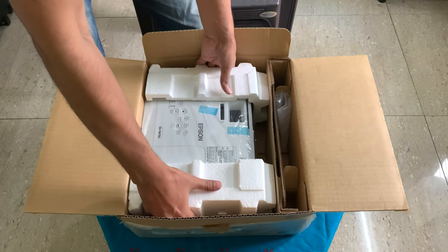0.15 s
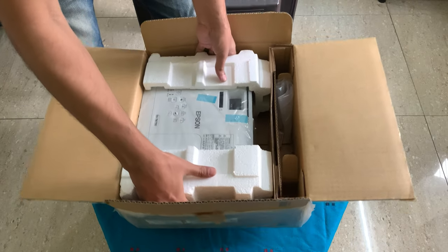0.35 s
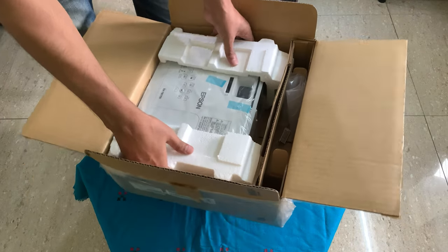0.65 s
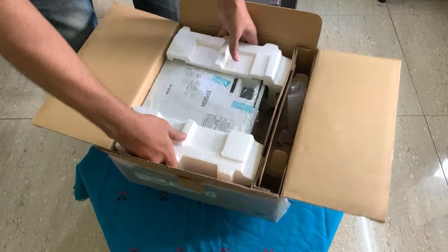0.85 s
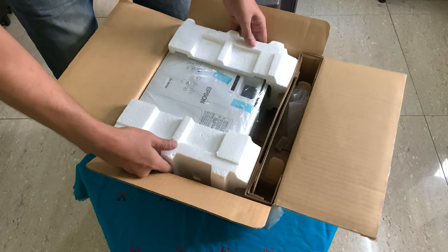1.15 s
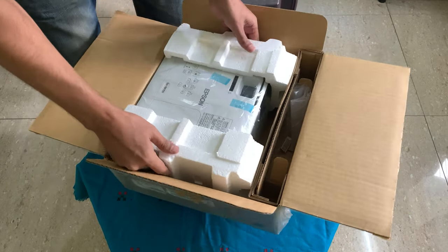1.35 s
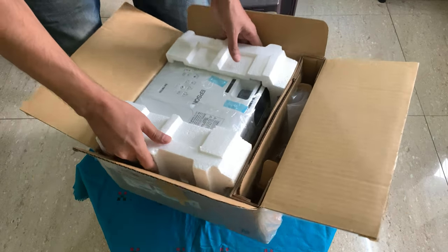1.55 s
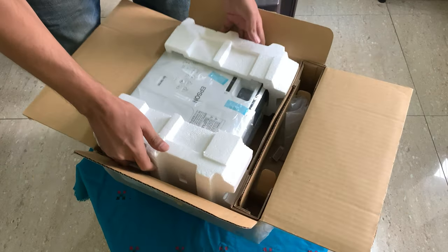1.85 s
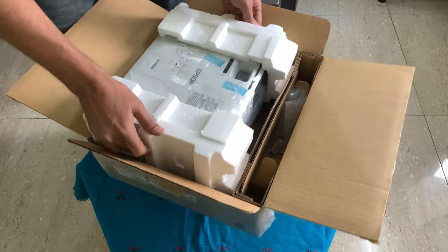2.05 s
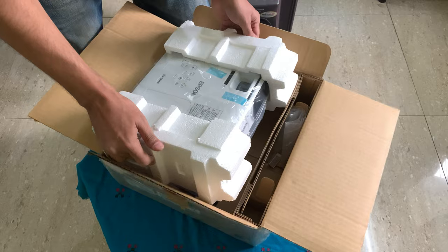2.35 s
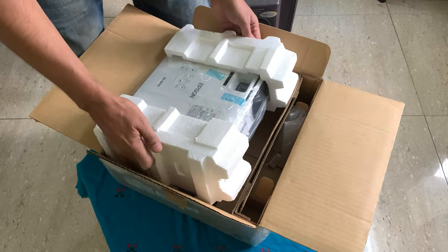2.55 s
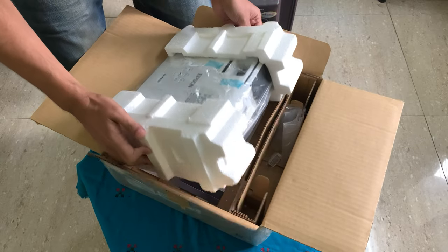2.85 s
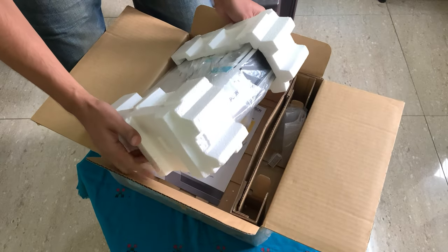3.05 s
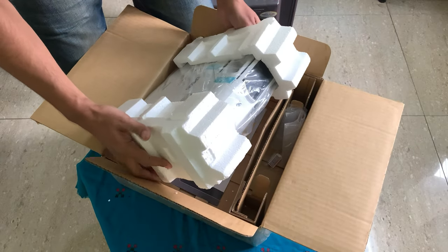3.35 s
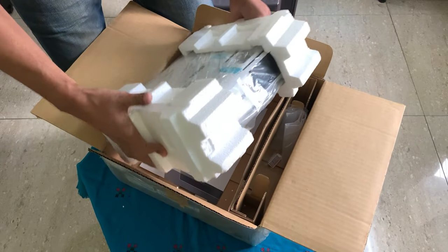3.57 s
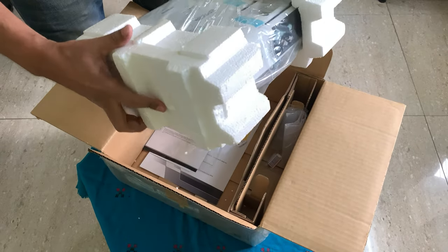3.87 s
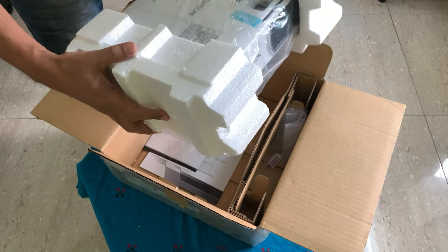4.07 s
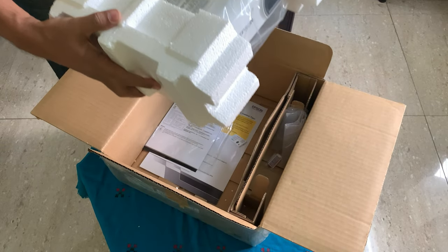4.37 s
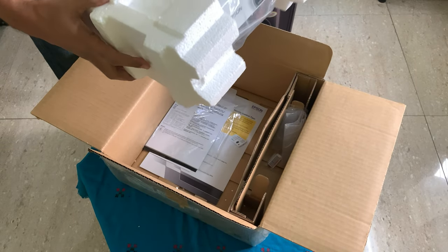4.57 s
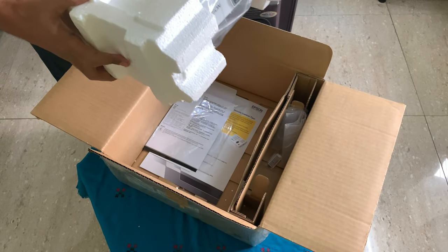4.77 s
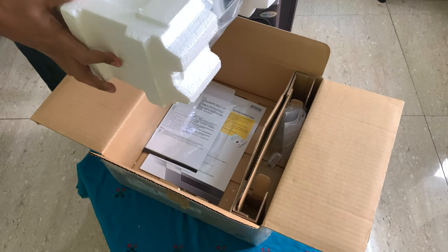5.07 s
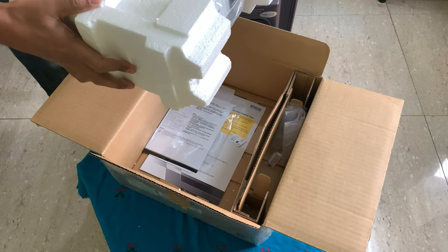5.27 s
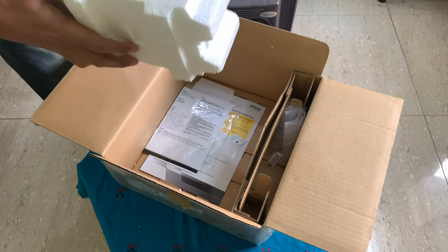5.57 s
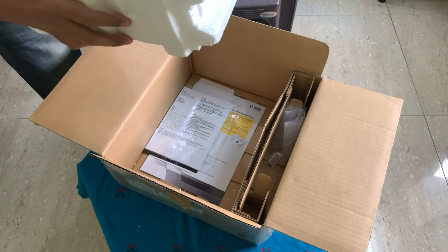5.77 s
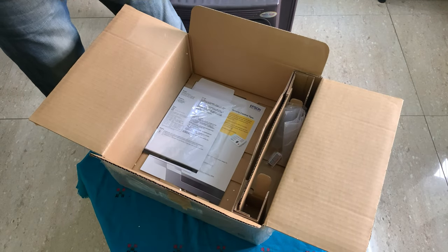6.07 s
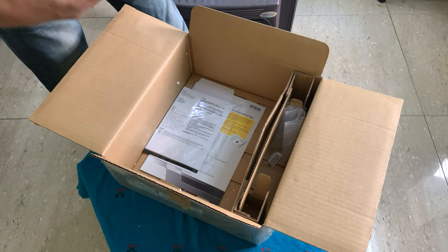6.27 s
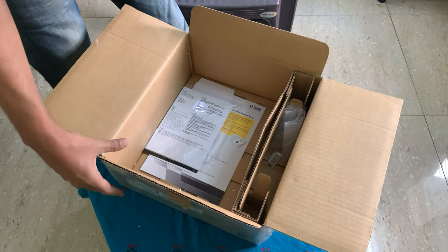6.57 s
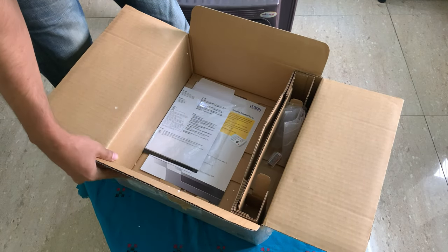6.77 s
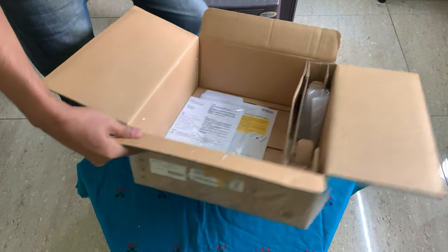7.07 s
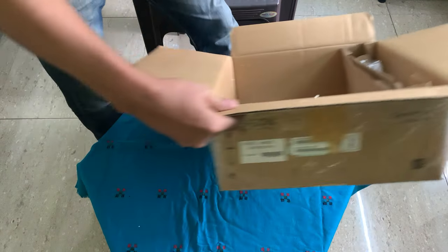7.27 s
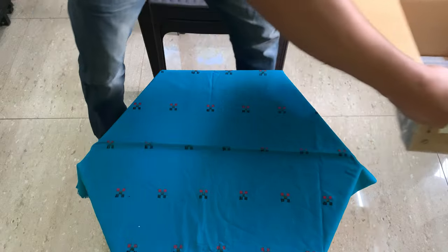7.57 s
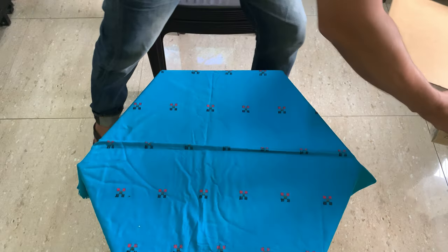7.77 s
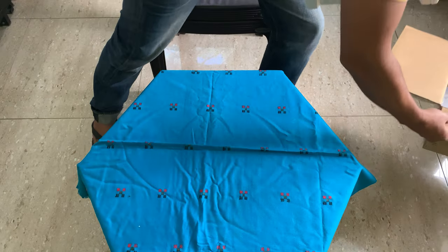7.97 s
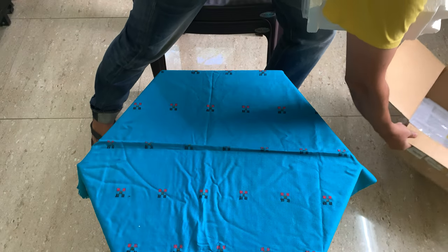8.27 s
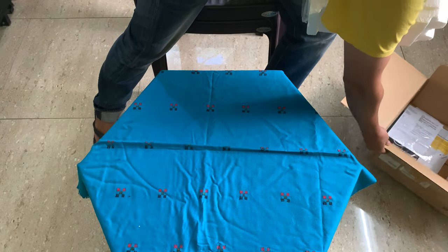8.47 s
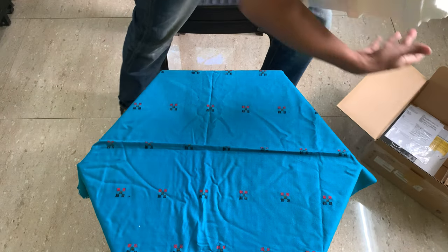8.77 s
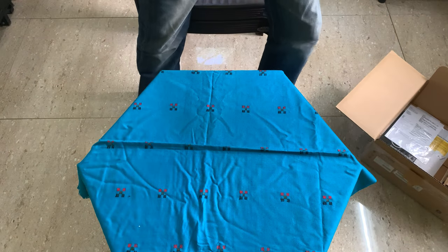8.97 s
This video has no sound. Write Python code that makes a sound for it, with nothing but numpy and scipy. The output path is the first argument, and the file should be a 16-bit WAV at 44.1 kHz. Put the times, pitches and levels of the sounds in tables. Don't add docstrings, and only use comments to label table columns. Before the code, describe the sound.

Indoors in a small hard-floored room, close phone microphone. Foam blocks hiss and scrape against cardboard in uneven tugs, with sharp snaps, wrap crackles and hollow box knocks. After the item is free, sparse crackles and faint squeaks remain; then the box rumbles, flaps flick softly, and it lands with a hollow thud on tile.

```python
import sys
import numpy as np
from scipy import signal
from scipy.fft import rfft, irfft, next_fast_len
from scipy.io import wavfile
from scipy.ndimage import uniform_filter1d

SR = 44100
rng = np.random.default_rng(int(sys.argv[2]) if len(sys.argv) > 2 else 0)


def ratio_of_db(decibels):
    return 10 ** (np.asarray(decibels, float) / 20)


def bounce(signal):
    frames = np.transpose(np.atleast_2d(signal))
    limited = np.clip(frames, -1, 1)
    pcm = np.round(limited * 32767).astype(np.int16)
    wavfile.write(sys.argv[1], SR, pcm)


N = 402480


def along(table, hz):
    f, v = np.transpose(table)
    return np.interp(np.log(hz + 1), np.log(f), v)


def colour(x, table):
    size = next_fast_len(x.shape[-1])
    gain = ratio_of_db(along(table, np.arange(size // 2 + 1) * SR / size))
    gain = gain / np.sqrt(np.mean(gain ** 2))
    return irfft(rfft(x, size) * gain, size)[..., :x.shape[-1]]


def walk(rate_hz):
    hold = int(SR / rate_hz)
    steps = np.repeat(rng.standard_normal(N // hold + 1), hold)
    return 2.37 * uniform_filter1d(steps, hold)[:N]


def add(out, start_s, sound):
    i = int(start_s * SR)
    out[:, i:i + sound.shape[1]] += sound[:, :N - i]


def blur(cells, bins, frames):
    return uniform_filter1d(uniform_filter1d(cells, size=bins, axis=-2), size=frames, axis=-1)


def slips(scatter_db):
    size = ratio_of_db(scatter_db * np.minimum(rng.exponential(size=N), 6))
    size = size / np.sqrt(np.mean(size ** 2))
    return size * rng.standard_normal((2, N))


def patchy(db, table, scatter_db, patch_db):
    cells = signal.stft(colour(ratio_of_db(db) * slips(scatter_db), table), nperseg=512)[2]
    field = blur(rng.standard_normal(cells.shape[1:]), bins=2, frames=7)
    cells = cells * ratio_of_db(patch_db * field / field.std())
    return signal.istft(cells, nperseg=512)[1][:, :N]


def strokes(rows):
    grid_s = np.arange(0, N / SR, .001)
    peak_s, db, swell_s, fade_s = np.transpose(rows)[..., None]
    away = np.maximum((peak_s - grid_s) / swell_s, (grid_s - peak_s) / fade_s)
    power = ratio_of_db(2 * (db - 20 * away)).sum(axis=0)
    return 10 * np.log10(np.interp(np.arange(N) / SR, grid_s, power) + 1e-12)


def shaken(after, slap):
    under_db, swell_s, fade_s = after
    return [(s + swell_s / 2, db + slap * slap_db + under_db, swell_s, fade_s)
            for s, db, _, slap_db, _ in KNOCKS]


# peak_s, hiss_db, swell_s, fade_s, card_share_db
TUGS = [(.05, -40, 0.29, 0.15, -9), (.2, -35, 0.1, 0.096, -11), (.45, -34.5, 0.11, 0.19, -10),
        (.75, -40, 0.2, 0.34, -9), (.948, -25.5, 0.04, 0.46, -18), (1.156, -27, 0.093, 0.093, -26),
        (1.498, -25.5, 0.028, 0.2, -18.5), (1.6, -18.5, 0.033, 0.033, -21),
        (1.78, -22.5, 0.066, 0.073, -14), (1.92, -23, 0.12, 0.029, -14.5), (1.99, -37.5, 0.12, 0.16, -3.5),
        (2.065, -17.5, 0.098, 0.083, -24), (2.18, -22.5, 0.26, 0.2, -19.5),
        (2.25, -35.5, 0.051, 0.038, -6.5), (2.43, -34, 0.048, 0.18, -8), (2.535, -25, 0.081, 0.062, -16),
        (2.64, -38, 0.037, .15, -12), (2.776, -21, 0.043, 0.11, -14), (2.85, -23, 0.067, 0.11, -17),
        (2.97, -29, 0.33, 0.24, -15.5), (3.23, -30, 0.56, 0.18, -10.5), (3.51, -32.5, 0.22, 0.6, -14),
        (3.81, -35, 0.16, 0.13, -6.5), (3.96, -35, 0.057, 0.089, -7.5), (4.168, -28, 0.16, 0.044, -18),
        (4.1, -35.5, 0.11, 0.083, -9), (4.27, -35.5, 0.17, 0.21, -9)]
# peak_s, hiss_db, swell_s, fade_s, card_share_db
SHIFTS = [(4.5, -27.5, 0.12, 0.073, -16), (4.851, -40, 0.72, 0.36, -12), (5.031, -30.5, 0.14, 0.022, -23),
          (5.18, -39.5, 0.16, 0.073, -16.5), (5.571, -39, 0.43, 0.074, -12.5),
          (5.681, -44.5, 0.04, 0.063, 6.5), (5.74, -31, 0.15, 0.058, -28), (6.099, -33, 0.34, 0.2, -15.5),
          (6.34, -45, 0.66, 0.49, -14.5), (6.69, -43, .03, 0.032, -16), (6.77, -49.5, 0.023, 0.41, -6),
          (7.08, -42, 0.15, .04, -8.5), (7.2, -48, 0.33, 0.45, -13.5), (7.451, -51.5, 0.079, 0.14, -4),
          (7.63, -42.5, 0.13, 0.23, -11), (8.001, -57, 0.16, 1, -6), (8.36, -43, 0.011, 0.19, -10.5),
          (8.54, -32.5, 0.031, 0.16, -12.5), (8.74, -36.5, 0.039, 0.2, -13),
          (8.92, -25.5, 0.011, 0.19, -15.5)]
# centre_s, dip_db, half_width_s
RESTS = [
    (1.419, -11.5, 0.14),
    (6.66, -13.5, 0.065),
    (8.28, -4, .07),
]
# under_knock_db, swell_s, fade_s
AFTER_GROAN = (-28, 0.027, 0.17)
CARD_SWELL, CARD_FADE = 1.54, 2.07
GROAN_DB, CARRIED_GROAN_DB = -11.5, -10.5


def on_card(rows, under_db):
    return [(s, db + card_db + under_db, swell_s * CARD_SWELL, fade_s * CARD_FADE)
            for s, db, swell_s, fade_s, card_db in rows]


def pressure():
    t = np.arange(N) / SR
    rest_db = sum(dip_db * np.exp(-((t - s) / width_s) ** 4) for s, dip_db, width_s in RESTS)
    hiss = [row[:4] for row in TUGS + SHIFTS]
    scrape = on_card(TUGS + SHIFTS, 0)
    groan = on_card(TUGS, GROAN_DB) + on_card(SHIFTS, CARRIED_GROAN_DB) + shaken(AFTER_GROAN, slap=True)
    return [strokes(rows) + rest_db for rows in (hiss, scrape, groan)]


# pitch_hz, level_db per Hz
BEADS = [(3500, -34.5), (5500, -14), (7000, -15), (8000, -3.5), (9000, 1.5), (12000, 1.5), (15600, 0),
         (15900, -64)]
# pitch_hz, level_db per Hz
CARD = [(1300, -31), (1900, -4), (3000, 0.5), (4000, -1.5), (5500, -3.5), (7500, -0.5), (10000, -22)]
# pitch_hz, level_db per Hz
GROAN = [(900, -40.5), (1200, -9), (1400, -7.5), (1530, -7.5), (1800, -9), (2400, -37)]
SCRAPE_SHUT_DB = -2.5


def rubbing(hiss_db, scrape_db, groan_db):
    judder = walk(35)
    hiss_db = hiss_db + .45 * judder + 1.0 * walk(150) + 1.7
    hiss = colour(ratio_of_db(hiss_db) * slips(1.5), BEADS)
    scrape_db = scrape_db + SCRAPE_SHUT_DB * shut() + 1.0 * judder - 0.5
    scrape = patchy(scrape_db, CARD, scatter_db=2.5, patch_db=3.0)
    groan = colour(ratio_of_db(groan_db + 1.2 * walk(40) - 0.5) * slips(2.1), GROAN)
    return hiss + scrape + groan


# start_s, end_s, rumble_db, panel_creak_db
HANDLED = [(0.0, 0.19, -48, -51.5), (0.182, 0.866, -54.5, -62.5), (1.493, 1.609, -80, -74),
           (1.58, 3.508, -49.5, -59), (3.472, 4.267, -55.5, -60.5), (4.84, 4.993, -68.5, -70),
           (5.244, 5.403, -56.5, -66), (5.632, 5.711, -61, -58), (5.716, 5.952, -88, -75),
           (6.167, 6.333, -65, -68), (6.73, 7.129, -58, -67), (7.19, 7.417, -64.5, -73.5),
           (7.417, 7.489, -52, -59.5), (7.581, 7.77, -48, -61.5), (7.781, 7.824, -53.5, -67),
           (7.833, 7.883, -54, -57.5), (8.113, 8.34, -63.5, -71.5), (8.361, 9.2, -74, -59.5)]


def shut():
    t = np.arange(N) / SR
    is_open = sum((t >= start_s) & (t < end_s) for start_s, end_s, _, _ in HANDLED)
    return uniform_filter1d(1. - is_open, size=400)


# pitch_hz, level_db per Hz
CREAK = [(380, -38), (480, -6.5), (700, 1), (900, -4.5), (1100, -3.5), (1400, -40)]
# pitch_hz, level_db per Hz
RUMBLE = [(30, -38), (60, -7.5), (100, -0.5), (200, -1.5), (330, -3.5), (450, -11), (700, -36)]
# under_knock_db, swell_s, fade_s
AFTER_RUMBLE = (-23.5, 0.04, 0.31)
# under_knock_db, swell_s, fade_s
AFTER_CREAK = (-14.5, .02, 0.16)
# rumble_db, creak_db
LEAK_DB = (-79, -82)
RUB_LEAK_DB, GATE_SHUT_DB = -15.5, -4


def box(blows, groan_db):
    t = np.arange(N) / SR
    rumble = np.full(N, ratio_of_db(LEAK_DB[0]))
    creak = np.hypot(ratio_of_db(LEAK_DB[1]), ratio_of_db(groan_db + RUB_LEAK_DB))
    rumbling = ratio_of_db(strokes(shaken(AFTER_RUMBLE, slap=False)))
    creaking = ratio_of_db(strokes(shaken(AFTER_CREAK, slap=True)))
    for start_s, end_s, rumble_db, creak_db in HANDLED:
        on = (t >= start_s) & (t < end_s)
        rumble[on] = np.hypot(ratio_of_db(rumble_db), rumbling[on])
        creak[on] = np.hypot(ratio_of_db(creak_db), creaking[on])
    rumble, creak = uniform_filter1d([rumble, creak], size=700)
    creak = colour(creak * ratio_of_db(1.6 * walk(30) + 3.5) * slips(1.5), CREAK)
    rumble = colour(rumble * ratio_of_db(1.4 * walk(25)) * slips(1.2), RUMBLE)
    return creak + rumble + blows * ratio_of_db(GATE_SHUT_DB * shut())


# start_s, peak_db, dull_part_db, length_s
CRACKS = [(0.364, -29.5, -9, 0.00092), (0.399, -15.5, -16, 0.00099), (0.4163, -24, -5.5, 0.0025),
          (0.619, -23, -14, 0.00081), (1.48, -16.5, -16.5, 0.00075), (3.2136, -3, -13, 0.0012),
          (3.223, -1, -19, 0.0014), (4.8385, -12, -23, 0.0024), (4.841, -15.5, -23, .002),
          (4.97, -23, -21, 0.0012), (5.065, -24, -18, 0.0017), (5.108, -22, -43, 0.0019),
          (6.247, -21, -23, 0.0015), (6.449, -27, -25, 0.00038), (6.55, -28, -26, 0.0005),
          (5.678, -25, -25, .001), (5.975, -23, -24, 0.0011), (7.466, -36, -20, .001),
          (7.487, -35, -23, .001), (6.764, -29, -17, 0.0012), (7.104, -25, -2.5, 0.0032),
          (7.264, -33, -24.5, 0.0013), (8.3535, -30.5, -4.5, 0.0061), (8.915, -19, -18, 0.002),
          (5.674, -33, -8, .004),
          (0.0255, -18.5, -18, 0.0083), (0.933, -27, -27, 0.0025), (1.25, -22, -25, 0.0033),
            (1.727, -26, -6.5, 0.0067), (2.303, -20, -6, 0.0056), (2.744, -18, -13, 0.006),
            (3.336, -19.5, -25, 0.0062), (3.448, -44, -28, 0.0048), (3.684, -22, -16, 0.0053),
            (3.744, -25, -26, 0.0058), (3.802, -13, -14, 0.0036), (3.894, -23, -5, 0.0034),
            (3.955, -18.5, -13, 0.0066), (4.264, -12, -30, 0.0035), (4.419, -24, -45, 0.004),
            (4.688, -19, -23, 0.0074), (4.7695, -23, -39, 0.0039), (5.318, -33, -5.5, 0.017),
            (5.376, -30.5, -8, 0.005), (5.45, -26, -34, 0.0051), (5.464, -18.5, -48, 0.006),
            (5.547, -19, -44, 0.0046), (5.926, -20, -18, 0.0035), (6.088, -18.5, -37, 0.016),
            (6.259, -16, -15.5, 0.0025), (6.302, -21, -38, 0.0053), (6.312, -11, -31.5, 0.0044),
            (7.568, -34.5, -18, 0.0036), (8.538, -18, -16, 0.0064), (8.935, -12, -18, 0.0044),]
# start_s, peak_db, dull_part_db
SNAPS = [(0.956, -21, -37), (1.006, -6, -19), (1.011, -10, -17), (1.742, -16, -6), (2.3084, -7, -21),
         (2.4011, -19, -9), (2.5705, -17, 0.5), (2.7184, -27, -17), (3.2134, -2, -12.5), (3.2253, -7, -11),
         (3.846, -31, -11), (3.897, -17, -10), (3.996, -29, -5), (4.06, -26, -2), (4.273, -18, -2),
         (4.385, -24, 3.5), (4.8374, -2, -26), (4.934, -24, -25), (4.9703, -3, -23), (5.067, -18, -17),
         (6.11, -18, -34), (6.3151, -11, -33), (6.7673, -15, -17), (6.2604, -6, -16), (8.996, -28, -20)]
# pitch_hz, level_db per Hz
SNAP = [(2500, -32), (5000, -38.5), (8000, 10), (12000, 18.5), (15500, 17), (17000, -20.5)]
SNAP_S = 0.00019


def cracks():
    bright, dull = np.zeros((2, N)), np.zeros((2, N))
    t = np.arange(2048) / SR
    for s, db, dull_db, length_s in CRACKS:
        u = t / length_s
        swell = (u * np.exp(1 - u)) ** max(450 * length_s, .5)
        burst = swell * ratio_of_db(db - 8.0) * rng.standard_normal((2, len(t)))
        add(bright, s, burst)
        add(dull, s, burst * ratio_of_db(dull_db - 1.0))
    for s, db, dull_db in SNAPS:
        signs = np.sign(rng.standard_normal((2, len(t))))
        burst = ratio_of_db(db - 5.0) * np.exp(-t / SNAP_S) * signs
        add(bright, s, burst)
        add(dull, s, burst * ratio_of_db(dull_db))
    return colour(bright, SNAP) + colour(dull, CARD)


# start_s, peak_db, pitch_hz
TICKS = [(0.054, -34, 1500), (0.7428, -32.5, 1540), (0.212, -30, 890), (1.48, -45, 1620),
         (2.57, -30.5, 700), (2.835, -30, 800), (1.742, -16.5, 1150), (2.558, -28.5, 1724),
         (3.086, -26, 2555), (3.2262, -14, 1218), (3.227, -21.5, 616), (3.2305, -19, 1222),
         (6.17, -47, 1480), (2.4342, -35, 3040), (3.4584, -38, 3200), (5.634, -41, 2980),
         (8.9171, -37, 1080), (2.5689, -26.5, 1293), (3.19, -23.5, 910), (3.214, -26.5, 2617),
         (5.69, -34, 1340), (5.896, -48.5, 1426)]


def ticks():
    out = np.zeros((2, N))
    t = np.arange(1024) / SR
    for s, db, hz in TICKS:
        mode_hz = hz * 2 ** (0.53 * rng.standard_normal((40, 1)))
        phase = 2 * rng.standard_normal((2, 40, 1))
        modes = np.sin(2 * np.pi * mode_hz * t + phase)
        add(out, s, ratio_of_db(db - 13) * np.exp(-t / .003) * modes.sum(axis=1))
    return out


# start_s, peak_db, centre_pitch_hz, slap_db, ring_s
KNOCKS = [(0.209, -24, 183, -7, 0.48), (0.454, -39.5, 135, -4, 0.42), (0.697, -43.5, 227, 0, 0.34),
          (1.482, -46, 143, -24.5, 0.19), (1.599, -14.5, 183.4, -27.5, 0.36),
          (1.641, -22, 130.5, -52.5, 0.57), (2.216, -17, 178, -28, 0.4), (2.249, -17.5, 130, -19.5, 0.29),
          (2.329, -16.5, 213, -35, 0.12), (2.859, -24, 111, -23.5, 0.24), (3.249, -22.5, 226, -10.5, 0.2),
          (3.681, -44, 206, -21.5, 0.39), (8.413, -17, 265.5, -30, 0.45), (8.369, -12.5, 267, -23, 0.26),
          (3.05, -28.5, 205, -29, 0.16), (6.167, -54, 270, -1, .3), (8.552, -28, 277, -3.5, 0.22),
          (9.014, -30.5, 102, -10, 0.058), (1.742, -16.5, 198, -6, 0.08), (2.566, -15, 211, -19.5, 0.19),
          (2.829, -14.5, 310, -17, 0.11), (3.158, -10.5, 197, -32, 0.08), (3.187, -9, 270, -18, 0.077),
          (3.196, -12.5, 278, -29.5, 0.052), (3.271, -28, 199, -31, .15), (3.866, -32, 158, -30, .12),
          (5.682, -46.5, 325, 2, 0.13), (8.36, -11, 239, -16, 0.08), (8.921, -21.5, 117, -0.5, 0.079)]
# start_s, peak_db, centre_pitch_hz, ring_s
THUDS = [(0.22, -17.5, 400, 0.17), (1.7554, -21.5, 393, 0.53), (2.5758, -17, 331, 0.13),
         (3.1934, -33.5, 230, 0.23), (8.921, -21, 330, 0.25), (0.21, -42.5, 66, 0.19),
         (8.128, -47.5, 79, 0.78), (6.73, -61, 265, 0.33), (6.258, -45, 255, 0.12), (2.22, -34.5, 390, 0.2),
         (8.378, -25.5, 82, 0.62), (8.705, -37.5, 82, 0.32)]
PANELS_HZ = [62, 80, 97.2, 108.9, 131, 160.3, 166.9, 192.2, 211.4, 222.2, 235.3, 277, 311, 329.5, 339.4,
             411, 441.5, 476]
# pitch_hz, level_db per Hz
SLAP = [(300, -14.5), (550, 22), (1200, 8.5), (2500, -4.5), (5000, -53), (9000, -53.5)]
THUD_SLAP_DB = -30


def knocks():
    ring, slap = np.zeros((2, N)), np.zeros((2, N))
    t = np.arange(SR // 3) / SR
    panels_hz = np.array(PANELS_HZ)
    thuds = [(s, db, hz, THUD_SLAP_DB, ring_s) for s, db, hz, ring_s in THUDS]
    for s, db, centre_hz, slap_db, ring_s in KNOCKS + thuds:
        near = np.argsort(np.abs(np.log(panels_hz / centre_hz)))[:9]
        hz = panels_hz[near, None]
        chance = rng.standard_normal((4, len(near), 1))
        push_s = 2.1 / centre_hz
        gain = ratio_of_db(-24 * np.log2(hz / centre_hz) ** 2 + 4 * chance[0])
        mode_ring_s = ring_s * (200 / hz) ** 0.75
        fade = np.exp(-np.log(1000) * t / mode_ring_s)
        turn = 2 * np.pi * hz * (1 + 0.027 * chance[1]) * (t - push_s)
        modes = gain * fade * np.cos(turn + 0.69 * chance[2:])
        sound = np.sum(modes, axis=1) * np.minimum(t / push_s, 1) ** 1.4
        add(ring, s, ratio_of_db(db) * sound / np.abs(sound[0]).max())
        add(slap, s, ratio_of_db(db + slap_db - 5) * np.exp(-t / .016) * rng.standard_normal((2, len(t))))
    return ring + colour(slap, SLAP)


# peak_s, level_db, swell_s, fade_s
SQUEAKS = [
    (4.86, -61, .03, .12),
    (5.07, -62, 0.021, 0.12),
    (5.76, -62, 0.077, .15),
    (5.895, -59, .03, .04),
    (5.96, -54, .04, .1),
    (6.03, -61, .05, 0.079),
    (6.17, -52, .04, .03),
    (6.25, -56, .03, 0.031),
    (2.775, -45, 0.018, .03),
]
# pitch_hz, level_db per Hz
SQUEAK = [(1150, -41.5), (1350, -2.5), (1480, 1), (1600, -4.5), (1900, -41)]


def squeaks():
    level_db = strokes(SQUEAKS) + 2.0 * walk(45)
    return colour(ratio_of_db(level_db) * slips(2.5), SQUEAK)


# start_s, peak_db, fall_s, first_pitch_hz
FLICKS = [
    (3.804, -36, 0.02, 527),
    (3.867, -32.5, 0.0111, 750),
    (4.166, -33, 0.0108, 810),
    (4.241, -47, 0.0076, 700),
    (4.372, -49.5, 0.015, 754),
    (7.572, -56.5, 0.032, 750),
    (7.626, -49, 0.0272, 750),
    (7.67, -54, 0.027, 750),
    (7.714, -48, 0.028, 757),
]


def flicks():
    out = np.zeros((2, N))
    for s, db, fall_s, first_hz in FLICKS:
        u = np.arange(int(3 * fall_s * SR)) / (fall_s * SR)
        pitch_hz = 140 + (first_hz - 140) * np.exp(-2.2 * u)
        turn = 2 * np.pi * np.cumsum(pitch_hz) / SR
        flutter_db = 1.9 * np.repeat(rng.standard_normal(48), 128)[:len(u)]
        shape = 4.1 * u * np.exp(-3.2 * u) * ratio_of_db(db + flutter_db)
        add(out, s, 1.72 * shape * np.array([np.sin(turn), np.cos(turn)]))
    return out


# pitch_hz, decay_s
ROOM_T60_S = [(100, 0.56), (1000, 0.37), (5000, 0.33), (15000, 0.13)]
# pitch_hz, level_db
ROOM_DB = [(100, -13), (400, -2), (1500, -6.5), (12000, -9.5)]


def room():
    t = np.arange(32768) / SR
    tail = 0
    for hz in 59.0 * 2 ** np.arange(9):
        octave = [(hz / 2, -60), (hz / 1.527, 0), (hz * 1.3, 0), (hz * 2, -60)]
        band = colour(rng.standard_normal((2, len(t))), octave)
        t60_s = along(ROOM_T60_S, hz)
        level = ratio_of_db(along(ROOM_DB, hz)) * np.sqrt(hz / t60_s) * 4 / SR
        tail = tail + band * level * np.exp(-np.log(1000) * t / t60_s)
    return (t == 0) + tail * (t > .004)


# pitch_hz, level_db per Hz
HUSH = [(50, 6), (500, -14), (1400, -8), (4000, -11), (8000, -8), (12000, 9), (15600, 5.5), (15900, -56.5)]
HUSH_DB = -83


def scene():
    levels = pressure()
    foam = rubbing(*levels) + cracks() + ticks() + squeaks()
    near = np.array([foam, knocks() + flicks()])
    foam, blows = signal.oaconvolve(near, room()[None], axes=2)[..., :N]
    hush = ratio_of_db(HUSH_DB) * colour(rng.standard_normal((2, N)), HUSH)
    return foam + box(blows, levels[-1]) + hush


# time_s, mono_below_hz
MONO = [(1.48, 40), (1.62, 190), (1.95, 320), (4.35, 280), (4.6, 560), (6.4, 720), (9.2, 620)]
# pitch_hz, level_db
TOP = [(15750, 0), (15900, -27)]
# low_hz, high_hz
ALIKE_HZ = (12600, 13900)
# low_hz, high_hz
CANCEL_HZ = (9200, 10100)
# low_hz, high_hz
SEAM_HZ = (7560, 7880)
# low_hz, high_hz
THIN_DIP_HZ = (2000, 7000)
THIN_DIP_SHARE = .55
LEARNT_S, OPPOSED_HZ, OPPOSED_OCT, OPPOSED_TURNS = 1.47, 287, 0.62, 0.23
EDGE_HZ, JOLT = 110, 5


def across_ports(ports):
    pair = np.array([[1, 0.93], [1, -1]]) / np.sqrt(2)
    hz, t, (mid, side) = signal.stft(pair @ ports, SR, nperseg=2048)
    octaves = np.log2((hz[:, None] + 1) / OPPOSED_HZ)
    turn = OPPOSED_TURNS * 2 * np.pi * np.exp(-(octaves / OPPOSED_OCT) ** 2) * (t < LEARNT_S)
    side = side + 1j * mid * np.sin(turn)
    mid = mid * np.cos(turn)
    follows = blur((side * mid.conj()).real, bins=9, frames=3)
    side = side - mid * follows / (blur(np.abs(mid) ** 2, bins=9, frames=3) + 1e-18)

    quiet = np.interp(t * SR, np.arange(N), shut()) > .5
    edge = EDGE_HZ * rng.standard_normal((2, len(t)))
    power = np.sum(np.abs(side) ** 2, axis=0)
    steady = power < JOLT * np.roll(power, 2)

    def within(band):
        return (hz[:, None] > band[0] + edge[0]) & (hz[:, None] < band[1] + edge[1]) & steady

    mid = mid * ~(within(CANCEL_HZ) | (within(SEAM_HZ) & quiet))
    above_mono = hz[:, None] > np.interp(t, *np.transpose(MONO))
    apart = above_mono & (hz[:, None] < TOP[0][0]) & ~within(ALIKE_HZ)
    cells = np.array([mid, side * apart])

    inside = (hz > THIN_DIP_HZ[0]) & (hz < THIN_DIP_HZ[1])
    fine = blur(np.abs(cells[:, inside]) ** 2, bins=7, frames=2)
    cells[:, inside] *= fine > THIN_DIP_SHARE * uniform_filter1d(fine, size=61, axis=1)
    return pair @ signal.istft(cells, SR, nperseg=2048)[1][:, :N]


def roll_off(x):
    return signal.sosfilt(signal.butter(12, 16820, fs=SR, output="sos"), x)


# pitch_hz, correlation (0-1)
PORT_LIKE = [(110, 1), (170, .988), (300, .96),
             (430, .87), (600, .6), (950, .7), (1700, .65), (2200, .55), (3000, .45), (3900, .1), (5600, .3),
             (6100, .75), (7600, .82), (8600, .9), (9200, .998), (10100, .998), (10800, .93),
               (17000, .93)]
# pitch_hz, lag in turns
LATE = [(520, 0), (730, -.5), (930, -1), (1150, -1.36), (1350, -1), (2100, -1.07), (3600, -1.33),
        (4300, -1), (6400, -.97), (7300, -.81), (9250, -.512), (10050, -.488), (12850, -.015),
        (13750, .015), (16000, .45), (17000, .5)]


def record(dry):
    size = next_fast_len(N)
    hz = np.arange(size // 2 + 1) * SR / size
    like = np.clip(along(PORT_LIKE, hz), -1, 1)
    share = np.sqrt([(1 + like) / 2, (1 - like) / 2])
    shared, apart = rfft(dry, size) * ratio_of_db(along(TOP, hz)) * share
    late = np.exp(-2j * np.pi * np.interp(hz, *np.transpose(LATE)))
    ports = irfft([shared + apart, (shared - apart) * late], size)[:, :N]
    mix = .8 * np.tanh(across_ports(ports) / .8)
    return roll_off(mix)


dry = scene()
out = record(dry)
bounce(out)
```